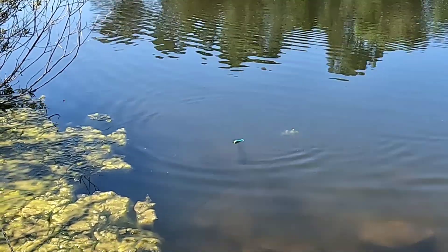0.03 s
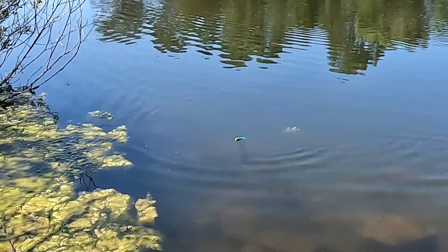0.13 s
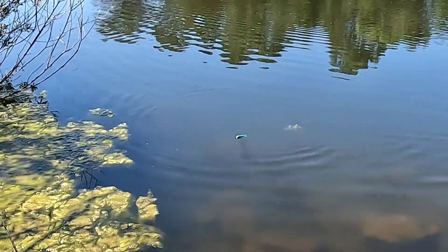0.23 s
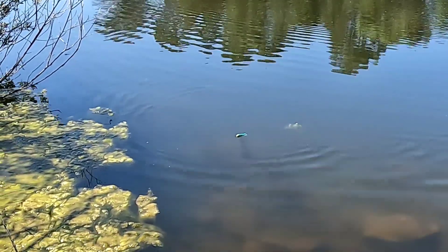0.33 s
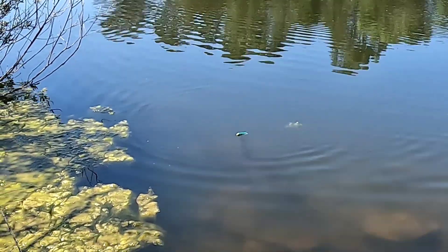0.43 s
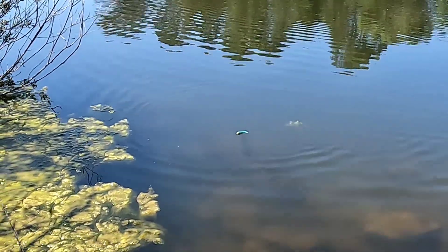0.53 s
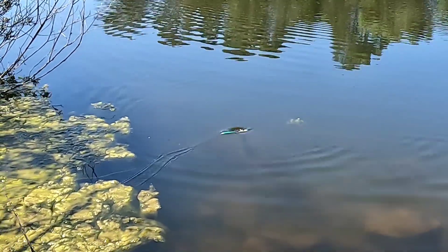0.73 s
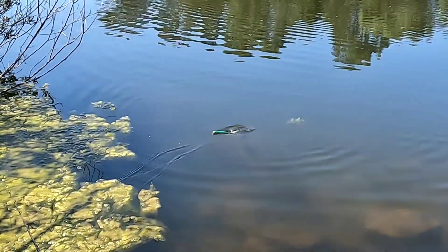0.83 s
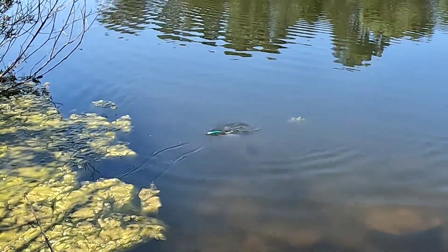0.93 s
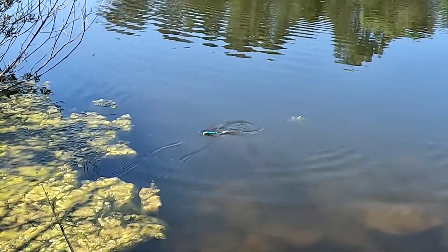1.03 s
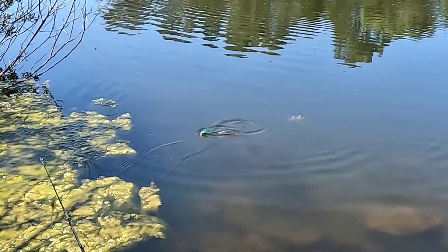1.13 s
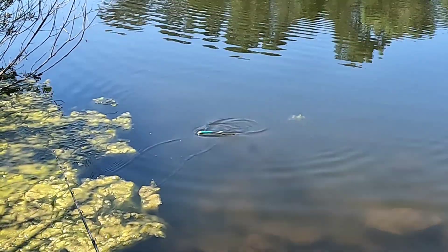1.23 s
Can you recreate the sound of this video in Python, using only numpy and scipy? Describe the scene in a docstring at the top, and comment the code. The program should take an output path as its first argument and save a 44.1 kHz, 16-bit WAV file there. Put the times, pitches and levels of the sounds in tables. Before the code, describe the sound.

A small fishing lure is jerked once across a calm pond. The line swishes and zips, ticks taut, and the lure rattles through a soft splash. Low handling thumps and air nudge the microphone under a quiet outdoor hush.

```python
"""A calm pond, heard from the bank. Under a quiet outdoor hush, soft handling thumps and swaying air
nudge the microphone, and a far bird chirps. A small lure is jerked once across the water: the line
swishes, rasps and zips as it tightens, the tackle snaps taut with a sharp tick that flicks off
droplets, and the lure rattles through its own soft splash. Line and water are dense grains fed
through resonances; the tick, rattles and thumps are single clicks ringing a body's modes."""
import sys
import numpy as np
from scipy import signal
from scipy.io import wavfile
from scipy.ndimage import map_coordinates

SR = 44100
rng = np.random.default_rng(int(sys.argv[2]) if len(sys.argv) > 2 else 0)


def int16_out(signal):
    """Quantize to a 16-bit WAV file."""
    q = np.round(np.clip(np.atleast_2d(signal).T, -1, 1) * 32767)
    wavfile.write(sys.argv[1], SR, q.astype(np.int16))


N = 57330
TIME = np.arange(N) / SR

# tone of the outdoor bed (frequency [Hz], relative density [dB])
HUSH_SPECTRUM = [(20, 1), (45, -5.5), (80, -14), (130, -16), (190, -15.5), (330, -27), (700, -35.5),
                 (1250, -34), (2000, -40.5), (3200, -48), (6500, -47.5), (8800, -57.5), (10600, -62),
                 (12000, -49.5), (13200, -65)]
# stereo image of the bed (frequency [Hz], left-right correlation [1 = mono])
HUSH_CORRELATION = [(40, .9), (130, 0.58), (350, 0.13), (1200, 0.094), (5000, 0.46), (12000, 0.15)]
# lean of the bed (frequency [Hz], left minus right [dB])
HUSH_PAN = [(60, 1.5), (250, -5.5), (500, -8), (1200, -2), (5000, 1.5), (12000, 8.5)]
# level of the bed, one shallow dip (time [s], gain [dB])
HUSH_LEVEL = [(0, 1), (.18, 0), (.28, -1.5), (.42, -1), (.52, 0.5), (1.3, 1)]
# envelope of the distant rush (time [s], level [dB])
RUSH_ENVELOPE = [(0, -78.5), (.2, -85.5), (.55, -94), (.95, -87.5), (1.1, -83), (1.22, -74.5), (1.3, -74.5)]
# handling bumps (time [s], strength [dB])
THUMP_HITS = [(.04, -49.5), (.115, -45), (.165, -44), (.40, -45), (.455, -46), (.556, -42), (.618, -43),
              (1.05, -58), (1.185, -44), (1.255, -49.5)]
# low ring of a bump (frequency [Hz], gain [dB], T60 [s])
THUMP_RING = [(52.9, 0, 0.074), (121, -6, 0.05)]
# swells of air on the microphone (centre time [s], half-width [s], level [dB])
AIR_SWELLS = [(0.203, 0.1, -41), (0.283, 0.052, -24.5), (0.428, 0.067, -46.5), (0.817, 0.095, -35.5)]
# the bird's falling note (time [s], pitch [Hz], level [dB])
BIRD_NOTE = [(.534, 5300, -84), (.541, 4970, -74), (.549, 4950, -71), (.552, 4480, -75), (.556, 4450, -75),
             (.561, 4200, -80), (.570, 4070, -81), (.585, 3800, -81)]
# colour of the swish at full speed (frequency [Hz], width [Hz], gain [dB])
SWISH_COLOUR = [(780, 240, -11), (1360, 250, -6), (1670, 240, -2.5), (2060, 173, 1.5), (2800, 1600, -17.5),
                (4300, 970, -20.5)]
# envelope of the rasp, ahead of its fades (time [s], level [dB])
RASP_ENVELOPE = [(.60, -85), (.645, -80.5), (.68, -72.5), (.703, -66.5), (.73, -72.5), (.748, -73.5),
                 (.78, -99)]
# colour of the rasp (frequency [Hz], width [Hz], gain [dB])
RASP_COLOUR = [(3930, 300, -3.5), (5600, 750, -4), (7430, 260, 2.5), (8500, 470, -8.5), (9680, 400, -6),
               (13200, 1900, -16)]
# short slips of the line (centre time [s], half-width [s], level [dB])
ZIP_SLIPS = [(.6865, .004, -63), (.6905, .002, -59), (.7125, .003, -64)]
# colour of a zip (frequency [Hz], width [Hz], gain [dB])
ZIP_COLOUR = [(5700, 240, 7.5), (7650, 350, 4), (8540, 610, -5.5), (10570, 1200, -7.5)]
# ring of the tackle snapping taut (frequency [Hz], gain [dB], T60 [s])
SNAP_RING = [(1294, -16, 0.074), (1530, -12.5, 0.011), (2130, -14.5, 0.042), (2497, -19.5, 0.027),
             (5380, -3.5, 0.026), (5760, -9.5, 0.023), (6250, -5, 0.0056), (6820, -7.5, 0.01),
             (7330, -3.5, 0.0075), (9770, -22, 0.0099)]
# colour of the droplets (frequency [Hz], width [Hz], gain [dB])
DROPLET_COLOUR = [(1390, 340, -1), (2200, 310, 4.5), (2510, 440, 3), (4730, 1200, 4.5), (5550, 500, 6),
                  (7050, 600, -2), (10300, 3100, -5)]
# colour of the splash (frequency [Hz], width [Hz], gain [dB])
SPLASH_COLOUR = [(1290, 360, -1.5), (1610, 210, -2.5), (1974, 130, 3), (2300, 92, 5.5), (2750, 720, -9),
                 (4175, 260, -7.5), (5500, 1800, -21), (7420, 480, -7), (9740, 480, -13), (12500, 730, -37)]
# knocks of the lure (time [s], strength [dB], low-pass cutoff [Hz])
RATTLE_HITS = [(.7833, -54.5, 4800), (0.8076, -51, 6950), (0.8225, -61, 2400), (0.8292, -57, 3000),
               (.8633, -54, 2190), (0.903, -67, 10900)]
# ring of the lure's body (frequency [Hz], gain [dB], T60 [s])
RATTLE_RING = [(1590, -2.5, 0.0062), (2297, -14.5, 0.055), (3080, -5, 0.0056), (4160, -9.5, 0.041),
               (4770, -10.5, 0.014), (5700, -10.5, 0.0069), (7000, -20, 0.01)]

SWISH_START_S, SWISH_PEAK_S, SNAP_S, SPLASH_S = .572, .709, .7208, .73


def from_db(db):
    """Decibels to gain."""
    return 10 ** (np.asarray(db) / 20)


def rms_one(x):
    """Scale to rms 1."""
    return x / np.sqrt(np.mean(x ** 2) + 1e-20)


def at_hz(points, hz):
    """Read a table on a log-frequency axis."""
    freqs, values = np.transpose(points)
    return np.interp(np.log(hz), np.log(freqs), values)


def automation(rows):
    """One per-sample curve for each column after the time."""
    times, *columns = np.transpose(rows)
    return [np.interp(TIME, times, column) for column in columns]


def pan(db):
    """Left and right gains; positive leans left."""
    return from_db(np.array([[db], [-db]]) / 2)


def drift(per_s):
    """A random modulator gliding between values of spread 1."""
    knots = rng.standard_normal(2000)
    return np.interp(TIME * per_s, np.arange(len(knots)), knots)


def stereo(mid, side, correlation):
    """Matrix two unrelated signals into a pair with the given correlation."""
    return np.sqrt(1 + correlation) * mid + np.sqrt(1 - correlation) * side * np.array([[1], [-1]])


def eq(x, kind, hz, order=2):
    """A Butterworth low-, high- or band-pass."""
    return signal.sosfilt(signal.butter(order, np.clip(hz, 10, .45 * SR), kind, fs=SR, output="sos"), x)


def band(x, hz, width_hz):
    """A band-pass set by centre and width."""
    return eq(x, "band", [hz - width_hz / 2, hz + width_hz / 2])


def resonance(x, hz, width_hz):
    """A two-pole resonance, unity gain at its peak."""
    radius, angle = np.exp(-np.pi * width_hz / SR), 2 * np.pi * hz / SR
    gain = (1 - radius ** 2) / 2
    return signal.lfilter([gain, 0, -gain], [1, -2 * radius * np.cos(angle), radius ** 2], x)


def strike(hits, modes, vary_db):
    """Clicks ring a body's modes, neighbouring modes in opposite polarity."""
    times, db = np.transpose(hits)
    variation_db = vary_db * rng.standard_normal((len(times), len(modes)))
    out = np.zeros(N)
    for k, (hz, mode_db, t60) in enumerate(modes):
        clicks = np.full(N, 1e-18)
        clicks[(times * SR).astype(int)] = from_db(db + mode_db + variation_db[:, k])
        radius, angle = from_db(-60 / (t60 * SR)), 2 * np.pi * hz / SR
        ring = signal.lfilter([0, np.sin(angle)], [1, -2 * radius * np.cos(angle), radius ** 2], clicks)
        out += (-1) ** k * ring
    return out


def grains(colour, per_s, spread_db, correlation):
    """A stereo texture of dense tiny clicks through resonances, at rms 1."""
    sizes = from_db(spread_db * np.minimum(rng.exponential(1, (2, N)), 4))
    polarity = rng.choice([-1, 1], (2, N))
    clicks = sizes * polarity * (rng.random((2, N)) < per_s / SR) + 1e-18
    rung = sum((-1) ** k * from_db(db) * resonance(clicks, hz, width)
               for k, (hz, width, db) in enumerate(colour))
    trimmed = eq(rung, "band", [colour[0][0] * .8, colour[-1][0] * 1.2])
    return rms_one(stereo(*trimmed, correlation))


def bank_scatter(x, wet_db=-9.5, t60_s=.05, predelay_s=.0028):
    """Stones and brush add a short tail, different at each ear."""
    t = TIME[:SR // 4]
    tail = rng.standard_normal((2, len(t))) * from_db(-60 * t / t60_s) * (t > predelay_s)
    tail /= np.sqrt(np.sum(tail ** 2, axis=1, keepdims=True))
    return x + from_db(wet_db) * signal.fftconvolve(x[None], tail, axes=1)[:, :N]


def hush(level_db=-58.5, flicker_db=2.5):
    """The bed of open air: third-octave noise bands, each flickering a little."""
    edges = 22 * 2 ** np.arange(0, 9.6, 1 / 3)
    centres, widths = (edges[1:] + edges[:-1]) / 2, np.diff(edges)
    white = rng.standard_normal((2, 2, N + SR // 4))  # pre-roll lets the filters settle
    bed = 0
    for k, (hz, width) in enumerate(zip(centres, widths)):
        pair = stereo(*band(white[k % 2], hz, width)[:, -N:], at_hz(HUSH_CORRELATION, hz))
        gain = from_db(at_hz(HUSH_SPECTRUM, hz) + flicker_db * drift(per_s=21.98))
        bed += gain * pan(at_hz(HUSH_PAN, hz)) * pair
    power = np.sum(from_db(at_hz(HUSH_SPECTRUM, centres)) ** 2 * widths) * 4 / SR
    shift_db, = automation(HUSH_LEVEL)
    return from_db(level_db + shift_db) * bed / np.sqrt(power)


def far_rush():
    """A smooth, distant midrange rush that sinks away, then builds toward the end."""
    db, = automation(RUSH_ENVELOPE)
    noise = band(rng.standard_normal((2, N)), hz=1213, width_hz=460)
    return from_db(db) * rms_one(stereo(*noise, correlation=.58))


def thin_hiss():
    """A faint, steady thread of top-end hiss, mostly on the left."""
    noise = band(rng.standard_normal((2, N)), hz=11900, width_hz=580)
    return from_db(-96.5) * pan(db=10.5) * rms_one(stereo(*noise, correlation=.056))


def handling_thumps():
    """Soft bumps of handling, each a short, muffled bass ring."""
    return eq(strike(THUMP_HITS, THUMP_RING, vary_db=0), "low", hz=171)


def air_sway(sway_hz=11.08):
    """Slow pressure swings buffet the microphone, with a little rumble riding on them."""
    rumble = from_db(-23.5) * rms_one(band(rng.standard_normal(N), hz=30, width_hz=30))
    out = 0
    for centre_s, half_s, db in AIR_SWELLS:
        t = TIME - centre_s
        swell = from_db(db) * np.exp(-(t / half_s) ** 2)
        out += swell * (np.cos(2 * np.pi * sway_hz * t) + rumble)
    return pan(db=-4) * out


def bird(roughness=.13):
    """One far-off whistle that holds, then steps down."""
    hz, db = automation(BIRD_NOTE)
    gate = (TIME > BIRD_NOTE[0][0]) & (TIME < BIRD_NOTE[-1][0])
    flutter = 1 + roughness * drift(per_s=400)
    whistle = np.sin(2 * np.pi * np.cumsum(hz) / SR)
    return bank_scatter(gate * from_db(db) * flutter * whistle)


def line_swish(peak_db=-59.5, rise_db_per_s=135, fall_db_per_s=421, octaves_per_s=1.7, fade_in_s=.04):
    """The line cuts air and water, climbing in pitch and level as it gathers speed, then dying fast."""
    t = TIME - SWISH_PEAK_S
    speed = 2 ** (octaves_per_s * np.clip(t, SWISH_START_S - SWISH_PEAK_S, 0))
    texture = grains(SWISH_COLOUR, per_s=12000, spread_db=1.5, correlation=.8)
    glide = np.array([map_coordinates(channel, [np.cumsum(speed)], order=3) for channel in texture])
    level_db = peak_db - np.maximum(-rise_db_per_s * t, fall_db_per_s * t)
    fade_in = np.clip((TIME - SWISH_START_S) / fade_in_s, 0, 1)
    return fade_in * from_db(level_db) * glide


def line_rasp(fade_s=.092):
    """The tightening line gives a bright, gritty rasp, dead centre."""
    db, = automation(RASP_ENVELOPE)
    inside_s = np.minimum(TIME - RASP_ENVELOPE[0][0], RASP_ENVELOPE[-1][0] - TIME)
    fade = np.clip(1 + inside_s / fade_s, 0, 1)  # fades lie outside the envelope's span
    return fade * from_db(db) * grains(RASP_COLOUR, per_s=3600, spread_db=3, correlation=1)


def line_zips():
    """The line slips in tiny bursts of treble grain."""
    envelope = sum(from_db(db) * np.exp(-((TIME - centre_s) / half_s) ** 2)
                   for centre_s, half_s, db in ZIP_SLIPS)
    return envelope * grains(ZIP_COLOUR, per_s=3600, spread_db=2, correlation=.96)


def tackle_snap():
    """The tackle comes taut: one hard, ringing tick."""
    return eq(strike([(SNAP_S, -36.5)], SNAP_RING, vary_db=2), "low", hz=8300)


def droplets(level_db=-57.5, attack_s=.0022, fall_db_per_s=603):
    """A brief crackle of water flicked off by the snap."""
    t = TIME - SNAP_S
    envelope = np.clip(t / attack_s, 0, 1) * from_db(level_db - fall_db_per_s * np.maximum(t, 0))
    return envelope * grains(DROPLET_COLOUR, per_s=4200, spread_db=5.5, correlation=.62)


def splash(level_db=-68.5, attack_s=.012, fall_after_s=.063, fall_db_per_s=91):
    """Fine spray and ripples behind the lure: quick attack, short hold, steady release."""
    t = TIME - SPLASH_S
    release_db = fall_db_per_s * np.maximum(t - fall_after_s, 0)
    envelope = np.clip(t / attack_s, 0, 1) * from_db(level_db - release_db)
    return envelope * grains(SPLASH_COLOUR, per_s=2500, spread_db=5, correlation=.68)


def lure_rattles():
    """Small knocks ring the lure's body, each contact crisp or dull."""
    return sum(eq(strike([(time_s, db)], RATTLE_RING, vary_db=1.5), "low", cutoff_hz)
               for time_s, db, cutoff_hz in RATTLE_HITS)


def scene():
    """The mix from the bank: ambience all round, the line centred, the lure a touch left."""
    ambience = hush() + far_rush() + air_sway() + handling_thumps() + bird()
    line = line_swish() + line_rasp() + line_zips()
    ticks = eq(tackle_snap() + lure_rattles(), "high", hz=970)  # so small a body sheds no bass
    lure = pan(db=.8) * (bank_scatter(ticks) + droplets() + splash())
    return ambience + line + lure + thin_hiss()


def record(dry):
    """Sound reaches the left microphone port a hair late; the top end is cut steeply."""
    lag_samples = .6
    left = map_coordinates(dry[0], [np.arange(N) - lag_samples], order=3, mode="nearest")
    return eq(np.stack([left, dry[1]]), "low", hz=13345, order=10)


dry = scene()
out = record(dry)
int16_out(out)
```